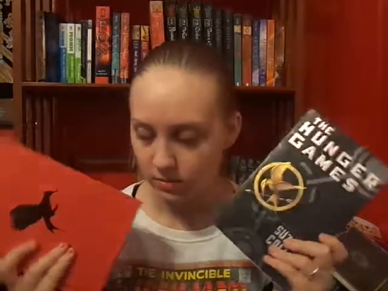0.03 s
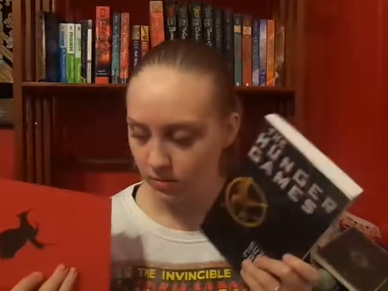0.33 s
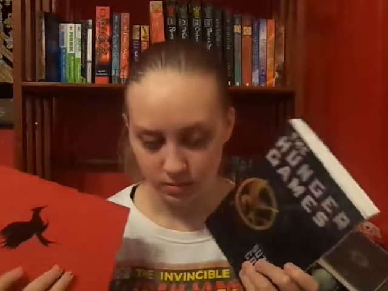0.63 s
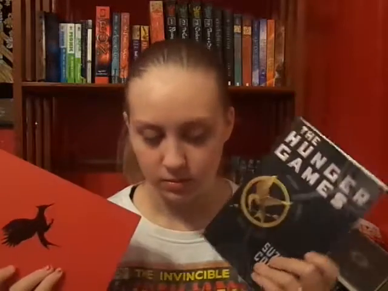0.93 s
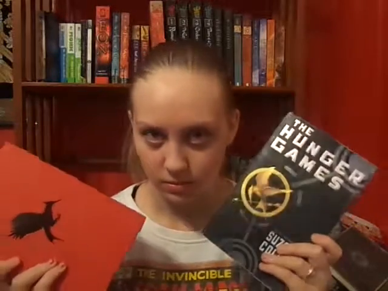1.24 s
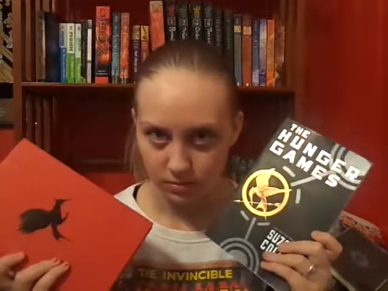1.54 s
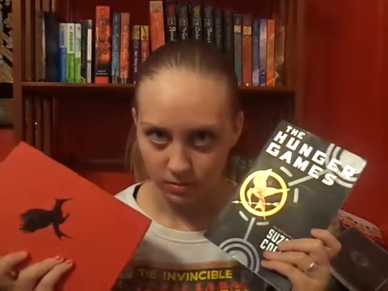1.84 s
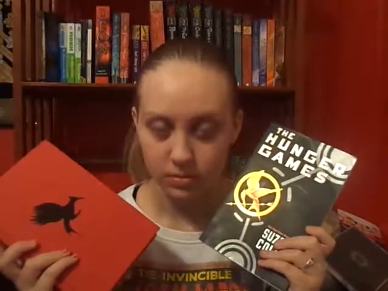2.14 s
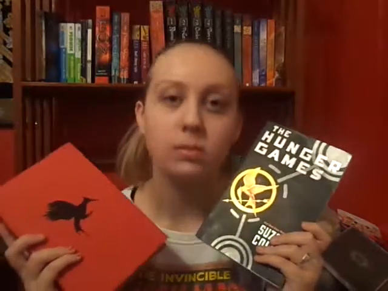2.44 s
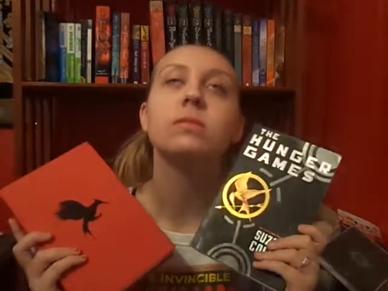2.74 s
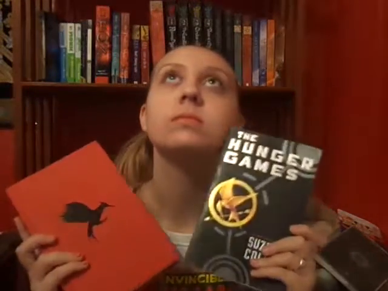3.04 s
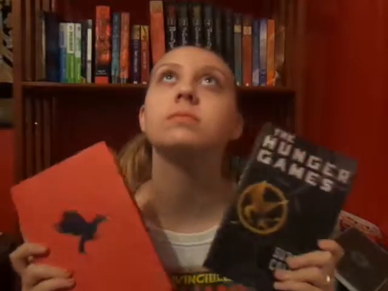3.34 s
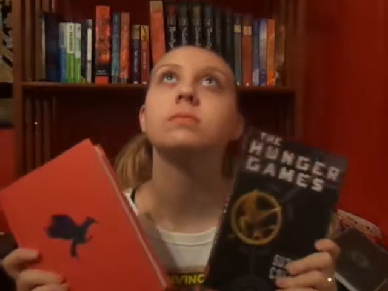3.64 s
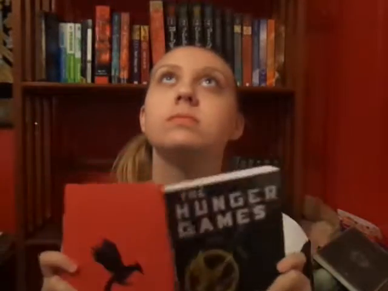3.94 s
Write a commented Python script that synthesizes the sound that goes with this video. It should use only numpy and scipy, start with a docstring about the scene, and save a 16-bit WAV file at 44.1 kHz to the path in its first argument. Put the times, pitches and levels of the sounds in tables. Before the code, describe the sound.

Two books are knocked together once, close to the microphone in a small, quiet room. Faint hiss and slight handling come first, then the covers meet flat with a sudden loud thump that dies quickly.

```python
"""Two books knocked together once, close to the microphone in a small, quiet room.
They shift faintly in the hands, graze, then meet flat near the end: squeezed air slaps out, the
covers ring briefly and the pages crackle. Near surfaces and the room throw the knock back.
Behind it lie microphone hiss, a faint fan-like whirr, a thin electronic whine and a few passing tones."""
import sys
import numpy as np
from scipy import signal
from scipy.fft import rfft, irfft
from scipy.io import wavfile
from scipy.ndimage import uniform_filter1d

SR = 44100
rng = np.random.default_rng(int(sys.argv[2]) if len(sys.argv) > 2 else 0)


def persist_wave(psi):
    """Save psi, clipped to +-1, as 16-bit WAV."""
    counts = np.round(np.clip(psi, -1, 1) * 32767).astype(np.int16)
    wavfile.write(sys.argv[1], SR, np.atleast_2d(counts).T)


N = 176400

# three grazes, then the flat hit (time [s], gain [dB], low-pass corner [Hz], cover ring gain [dB])
CONTACTS = [(3.8059, -22.5, 720, -14), (3.8093, -13, 480, -14), (3.839, -8, 950, -6),
            (3.8420, 11, 11000, -1)]
# soft bumps of the books in the hands (time [s], gain [dB])
HAND_BUMPS = [(0.115, -44), (0.206, -34.5), (0.561, -45), (3.171, -33), (3.809, -17.5), (3.8325, -30)]
# air squeezed out between the covers (frequency [Hz], relative level [dB])
SLAP_SPECTRUM = [(30, -53), (90, -27), (170, -14.5), (300, -6.5), (600, 2.5), (850, -4), (1150, 0.5),
                 (1500, -9), (1780, -21), (2250, -12), (3000, -32.5), (4500, -43), (15000, -59)]
# dull push of a book held loosely (frequency [Hz], relative level [dB])
THUD_SPECTRUM = [(30, -31), (100, -15), (200, -0.5), (300, 0.5), (680, -6), (1000, -15), (3000, -34),
                 (15000, -53)]
# ring of covers and page blocks (frequency [Hz], relative level [dB], t60 [s])
COVER_MODES = [(251, -39.5, 0.1), (461, -41, .04), (667, -35, 0.023), (956, -37, 0.039), (1486, -50, 0.059),
               (1810, -37.5, 0.031), (2133, -35, 0.025), (2610, -39, 0.022), (3490, -49, 0.029)]
# fingers brushing the covers (time [s], length [s], rms level at the crest [dB])
FINGER_BRUSHES = [(0.09, .07, -64), (0.46, 0.046, -64), (0.678, .08, -62.5)]
# echoes off near surfaces (delay [s], level against the direct sound [dB])
NEAR_ECHOES = [(.0028, -13), (.0041, -7.5), (.0061, -8), (.0079, -17), (0.0108, -12), (.0175, -17),
               (.0305, -21)]
# colour of the room's tail (frequency [Hz], relative level [dB])
TAIL_SPECTRUM = [(60, -26), (180, -5), (265, 0), (330, -7.5), (480, -5), (750, -3), (1150, -3), (1800, 6.5),
                 (2200, -1.5), (2900, 4.5), (4000, 9.5), (8000, -1), (15000, -4)]
# decay of the room's tail (frequency [Hz], t60 [s])
TAIL_DECAY = [(100, 0.28), (300, 0.43), (700, 0.38), (1400, 0.31), (2800, 0.35), (6000, .25), (14000, 0.3)]
# standing waves of the room (frequency [Hz], gain [dB], t60 [s])
STANDING_WAVES = [(277.4, -54.5, 0.26), (525, -66, 0.42), (1180, -79, 0.35)]
# microphone hiss and room tone (frequency [Hz], relative level [dB])
HISS_SPECTRUM = [(20, 6), (60, -8.5), (130, -3.5), (280, -1.5), (600, 0), (1100, -1), (1750, -5),
                 (3000, -6), (5000, -8.5), (15000, -10)]
# resonances of the whirr (frequency [Hz], half-width [Hz], rms level [dB])
WHIRR_BANDS = [(667, 17, -80), (845, 41, -77), (1313, 61, -68), (1512, 63, -72.5), (1920, 120, -77),
               (2390, 114, -74)]
# faint passing tones (time [s], length [s], frequency [Hz], rms level at the crest [dB])
PASSING_TONES = [(0.484, .13, 6715, -74), (1.755, 0.056, 475, -65), (1.85, 0.12, 509, -66.5),
                 (3.43, .08, 6725, -73), (3.57, 0.074, 6725, -75), (3.9, .07, 6700, -72)]

RING_RISE_S = 0.0042
PAGES_DB, PAGES_T60_S, PAGES_HIGHPASS_HZ = -28, 0.075, 2580
SNAP_DB, SNAP_T60_S, SNAP_HIGHPASS_HZ = -41, 0.015, 6000
TAIL_GAIN_DB, TAIL_DELAY_S, TAIL_RISE_S = -4, 0.0084, 0.0042
HISS_DB, TONE_WAVER_HZ = -59.5, 8.6
WHINE_DB, WHINE_HZ, FRAME_HZ = -71, 12272, 29.97
CUTOFF_HZ = 15120


def knock(db, corner_hz, ring_db):
    """Air slap, cover ring, page crackle and jacket snap; a glancing contact is duller and rings less."""
    slap = pulse(SLAP_SPECTRUM)
    t = np.arange(len(slap)) / SR
    covers = amp(ring_db) * ring(COVER_MODES, t) * (1 - np.exp(-t / RING_RISE_S))
    pages = crackle(t, PAGES_DB, PAGES_T60_S, PAGES_HIGHPASS_HZ)
    snap = crackle(t, SNAP_DB, SNAP_T60_S, SNAP_HIGHPASS_HZ)
    return amp(db) * filtered(slap + covers + pages + snap, corner_hz, "low")


def crackle(t, db, t60, highpass_hz):
    """Struck paper: a dying burst of spiky treble noise, its energy set by db."""
    burst = filtered(rng.laplace(size=len(t)), highpass_hz, "high") * amp(-60 * t / t60)
    return amp(db) * burst / np.linalg.norm(burst)


def books():
    """Close to the microphone, two books bump softly in the hands, graze and meet flat."""
    out = np.zeros(N)
    for start, db in HAND_BUMPS:
        add(out, start, amp(db) * pulse(THUD_SPECTRUM))
    for start, db, corner_hz, ring_db in CONTACTS:
        add(out, start, knock(db, corner_hz, ring_db))
    return out


def finger_brushes():
    """Fingers slide on the covers: short swells of papery friction, close and dry."""
    swells = np.zeros(N)
    for start, length, db in FINGER_BRUSHES:
        t = np.arange(0, length, 1 / SR)
        add(swells, start, amp(db) * np.sin(np.pi * t / length))
    friction = unit(filtered(rng.laplace(size=N), hz=3500, kind="high"))
    return swells * friction


def small_room(source):
    """The microphone hears direct sound, near echoes, standing waves and a tail dying band by band."""
    t = np.arange(SR // 2) / SR
    build_up = 1 - np.exp(-np.maximum(t - TAIL_DELAY_S, 0) / TAIL_RISE_S)
    reflections = rng.choice([-1., 1.], len(t)) * build_up
    hz, times, bands = signal.stft(reflections, SR, nperseg=256)
    t60 = curve_at(TAIL_DECAY, hz)[:, None]
    bands *= amp(curve_at(TAIL_SPECTRUM, hz)[:, None] - 60 * times / t60)
    bands *= np.sqrt(2 * np.log(1000) / (t60 * SR))  # offsets the extra energy of a longer decay
    tail = signal.istft(bands, SR, nperseg=256)[1][:len(t)]
    response = amp(TAIL_GAIN_DB) * tail + ring(STANDING_WAVES, t)
    response[0] += 1  # direct sound
    for delay, db in NEAR_ECHOES:
        add(response, delay, amp([db]))
    return signal.fftconvolve(source, response)[:N]


def hiss():
    """The microphone's own even hiss, together with the room tone."""
    hz = np.fft.rfftfreq(N, 1 / SR)
    return amp(HISS_DB) * noise(amp(curve_at(HISS_SPECTRUM, hz)))


def whirr():
    """A faint fan-like whirr: steady noise in narrow resonances."""
    hz = np.fft.rfftfreq(N, 1 / SR)
    return sum(amp(db) * noise(1 / (1 + ((hz - centre) / half_width) ** 2))
               for centre, half_width, db in WHIRR_BANDS)


def camera_whine():
    """A camera's thin high tone; it restarts at the frame rate, which adds a faint buzz."""
    since_restart = np.arange(N) / SR % (1 / FRAME_HZ)
    return amp(WHINE_DB) * np.sqrt(2) * np.sin(2 * np.pi * WHINE_HZ * since_restart)


def passing_tones():
    """Short wavering tones that barely rise out of the hiss."""
    out = np.zeros(N)
    waver_hz = TONE_WAVER_HZ * unit(uniform_filter1d(rng.standard_normal(N), size=900))
    for start, length, hz, db in PASSING_TONES:
        t = np.arange(0, length, 1 / SR)
        pitch_hz = hz + waver_hz[round(start * SR):][:len(t)]
        turns = np.cumsum(pitch_hz) / SR
        swell = amp(db) * np.sqrt(2) * np.sin(np.pi * t / length)
        add(out, start, swell * np.sin(2 * np.pi * turns))
    return out


def pulse(spectrum, size=8192):
    """A minimum-phase pressure pulse of energy 1 with the given spectrum."""
    hz = abs(np.fft.fftfreq(size, 1 / SR))
    log_gain = np.log(amp(curve_at(spectrum, hz)))
    minimum_phase = np.exp(np.conj(signal.hilbert(log_gain)))
    wave = np.fft.ifft(minimum_phase).real[:size // 2]
    return wave / np.linalg.norm(wave)


def ring(modes, t):
    """A sum of dying sines."""
    return sum(amp(db - 60 * t / t60) * np.sin(2 * np.pi * hz * t) for hz, db, t60 in modes)


def noise(gain):
    """Steady noise of rms 1, shaped by a gain per frequency."""
    return unit(irfft(rfft(rng.standard_normal(N)) * gain, N))


def filtered(x, hz, kind):
    """Second-order low-pass or high-pass."""
    return signal.sosfilt(signal.butter(2, min(hz, SR / 2 - 1), kind, fs=SR, output="sos"), x)


def curve_at(points, hz):
    """Interpolates a table on a log-frequency axis."""
    points_hz, values = np.transpose(points)
    return np.interp(np.log(hz + 1), np.log(points_hz + 1), values)


def amp(db):
    """Decibels to gain."""
    return 10 ** (np.asarray(db) / 20)


def unit(x):
    """Scales to an rms of 1."""
    return x / np.sqrt(np.mean(x ** 2) + 1e-20)


def add(mix, start, sound):
    """Mixes a sound in at start seconds."""
    part = mix[round(start * SR):][:len(sound)]
    part += sound[:len(part)]


def scene():
    """One microphone close to the books, with the quiet room behind them."""
    foreground = small_room(books())
    background = hiss() + whirr() + camera_whine() + passing_tones()
    return (foreground + finger_brushes() + background)[None]


def record(dry):
    """The recorder cuts off the highest treble steeply."""
    lowpass = signal.firwin(1023, CUTOFF_HZ, window=("kaiser", 9), fs=SR)
    return signal.oaconvolve(dry, lowpass[None], "same")


dry = scene()
out = record(dry)
persist_wave(out)
```